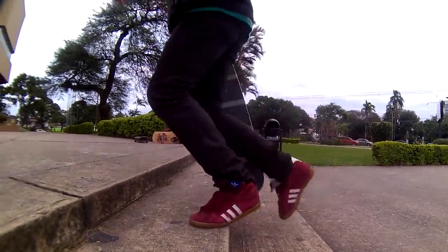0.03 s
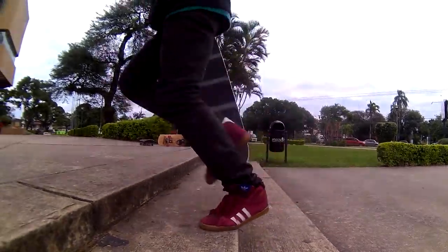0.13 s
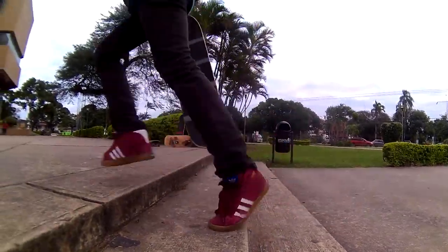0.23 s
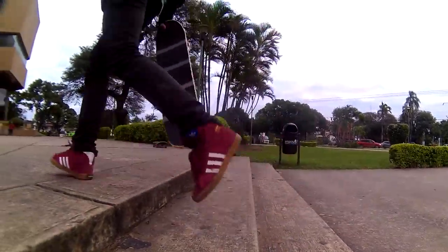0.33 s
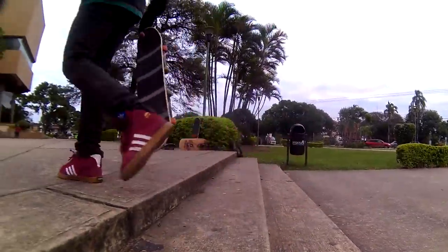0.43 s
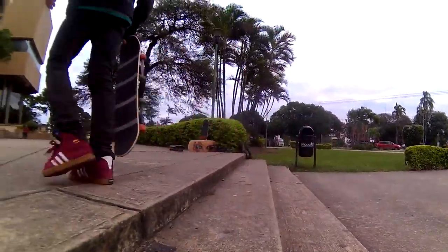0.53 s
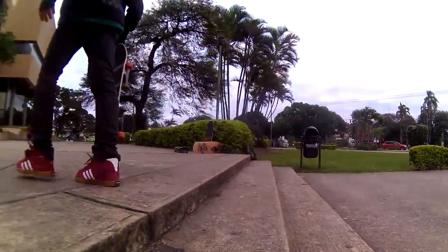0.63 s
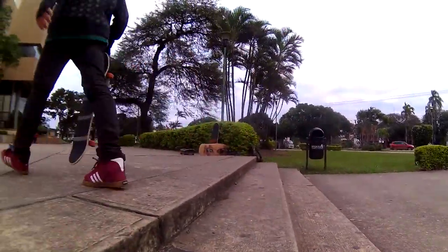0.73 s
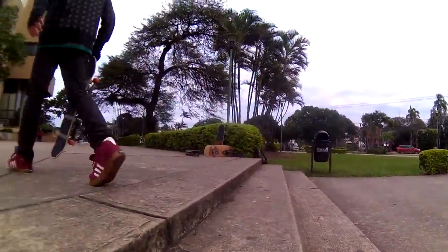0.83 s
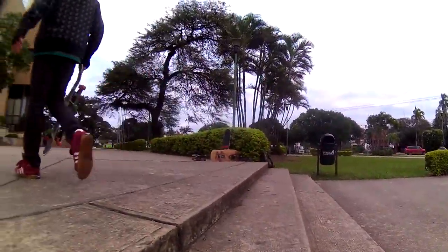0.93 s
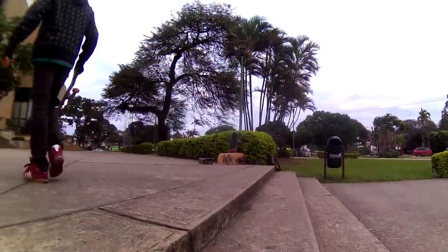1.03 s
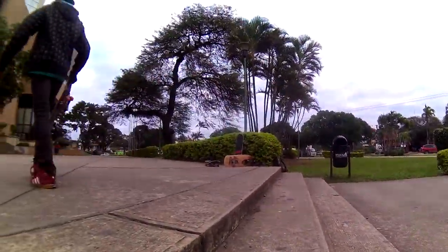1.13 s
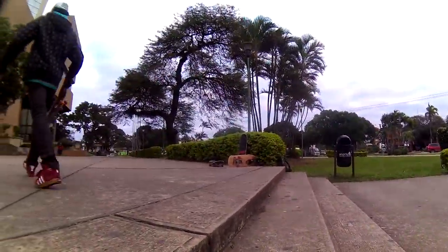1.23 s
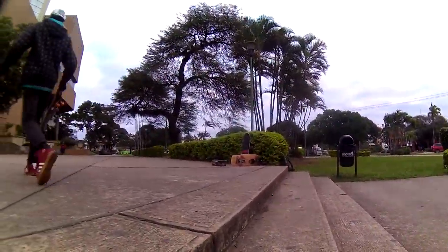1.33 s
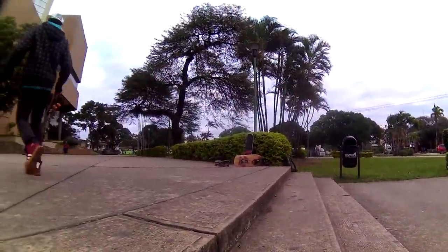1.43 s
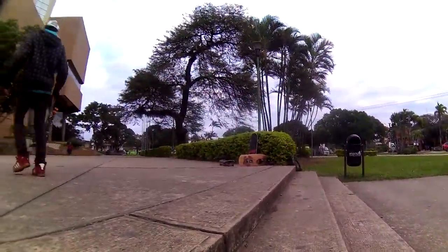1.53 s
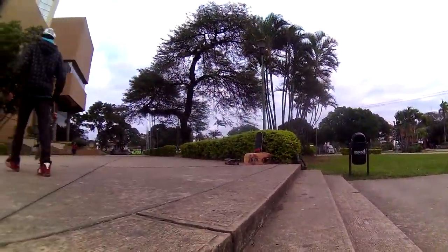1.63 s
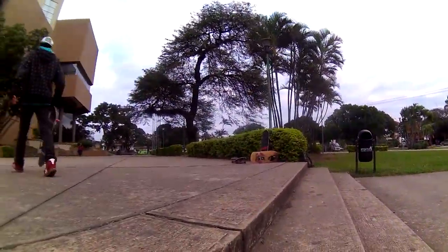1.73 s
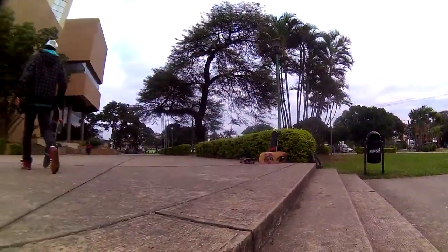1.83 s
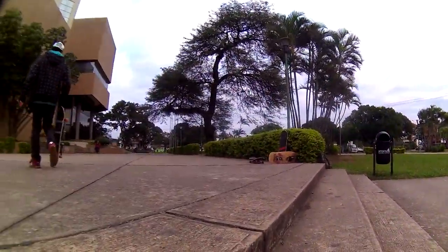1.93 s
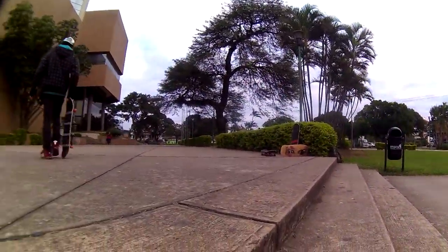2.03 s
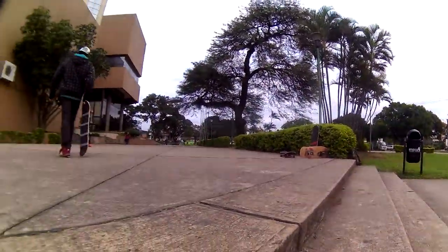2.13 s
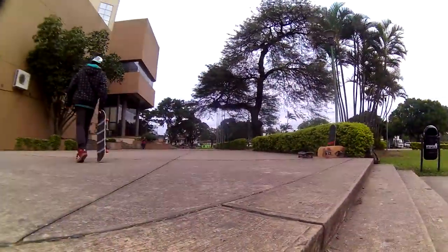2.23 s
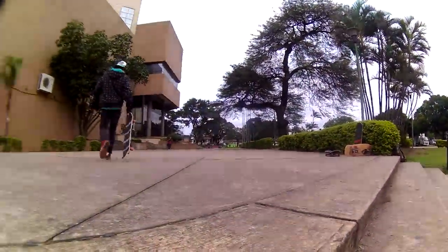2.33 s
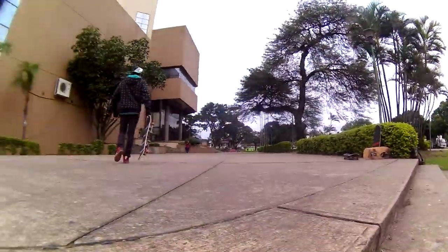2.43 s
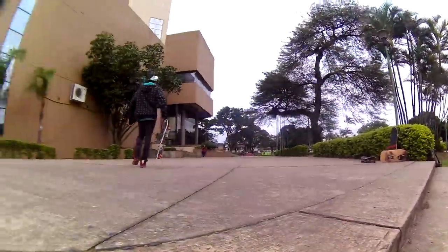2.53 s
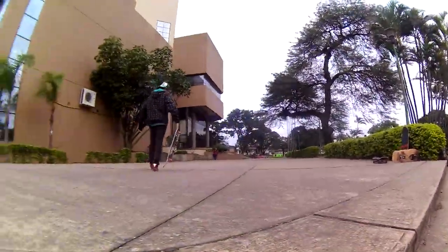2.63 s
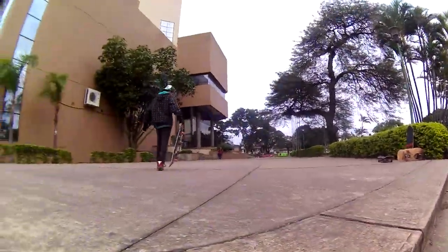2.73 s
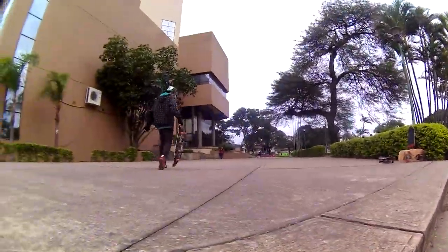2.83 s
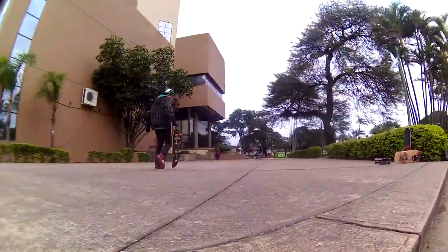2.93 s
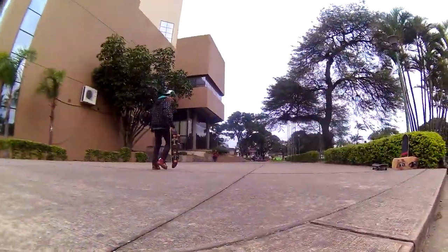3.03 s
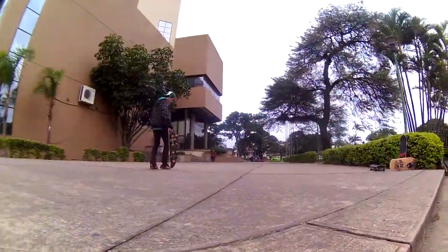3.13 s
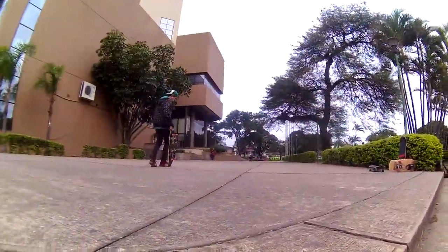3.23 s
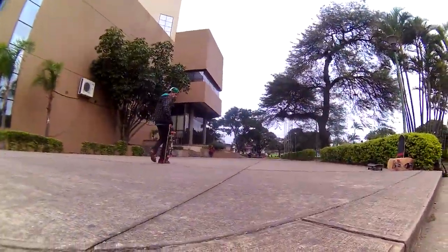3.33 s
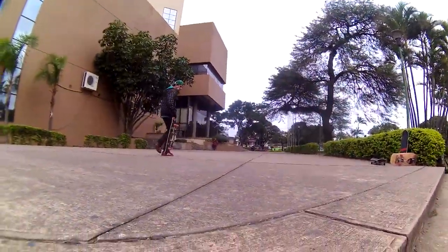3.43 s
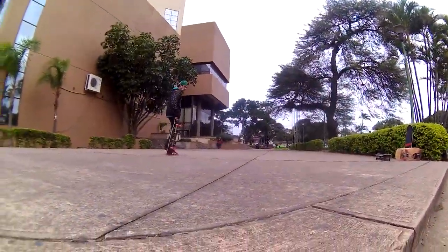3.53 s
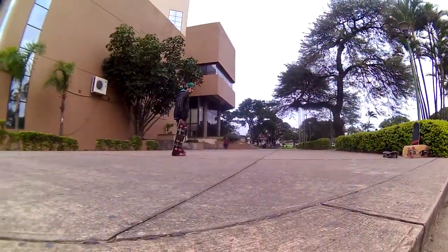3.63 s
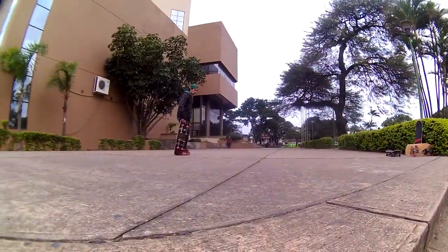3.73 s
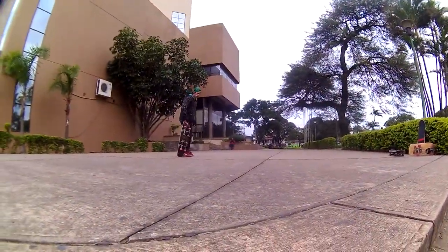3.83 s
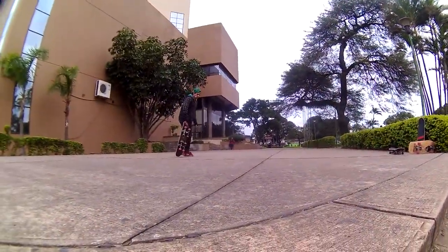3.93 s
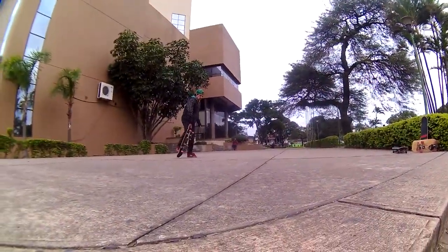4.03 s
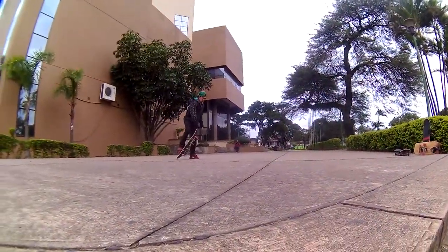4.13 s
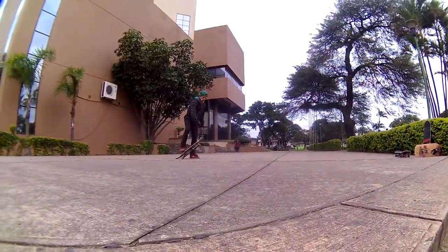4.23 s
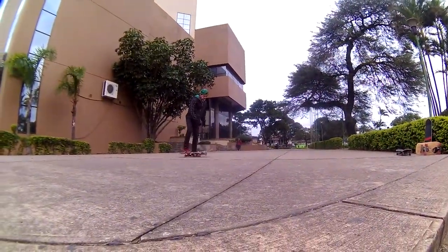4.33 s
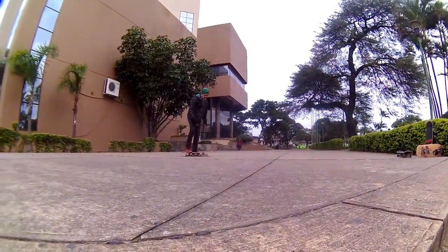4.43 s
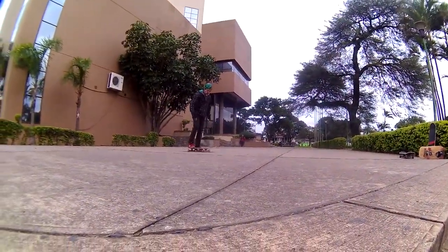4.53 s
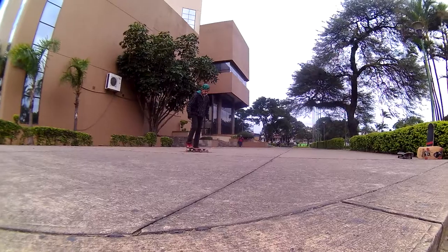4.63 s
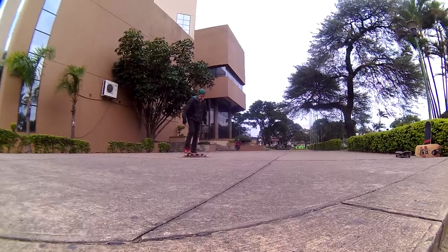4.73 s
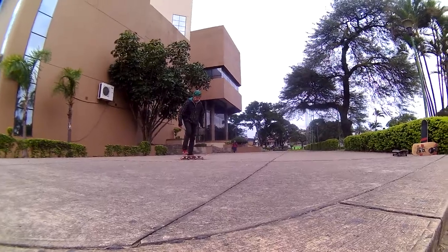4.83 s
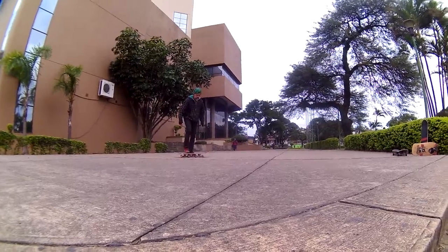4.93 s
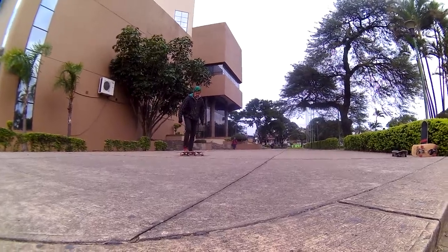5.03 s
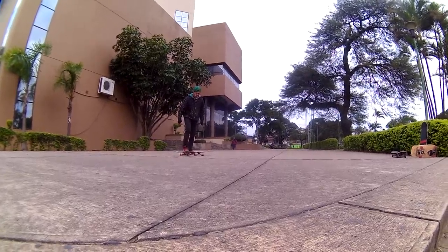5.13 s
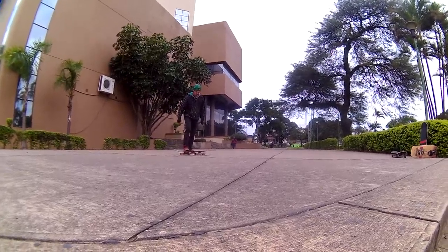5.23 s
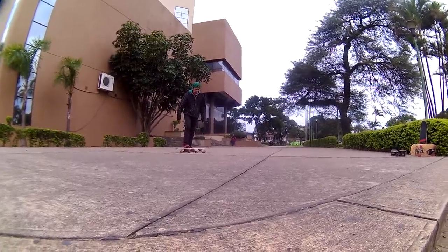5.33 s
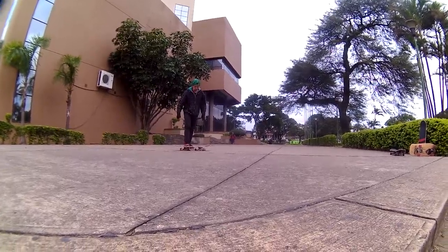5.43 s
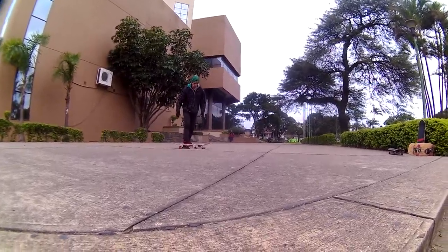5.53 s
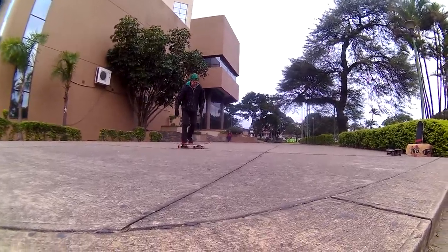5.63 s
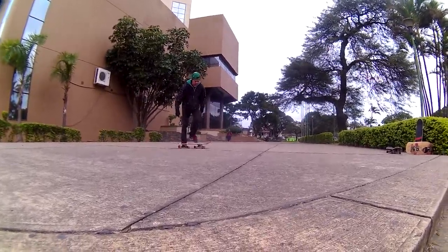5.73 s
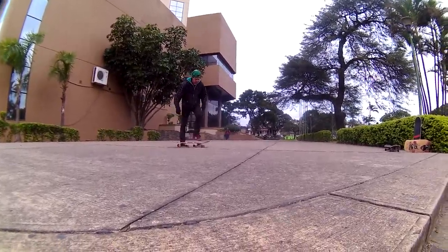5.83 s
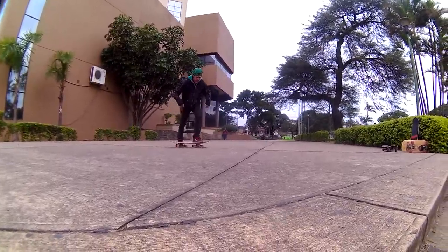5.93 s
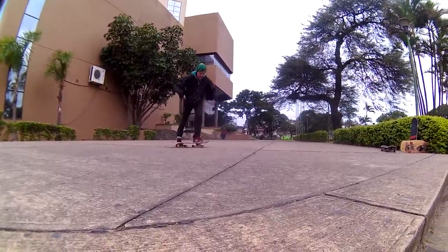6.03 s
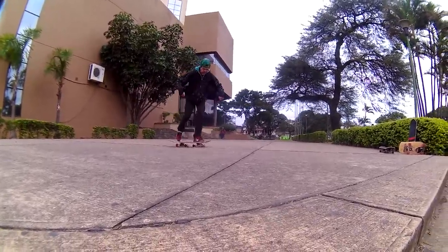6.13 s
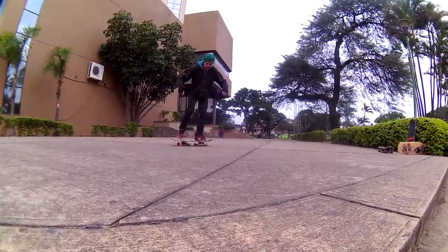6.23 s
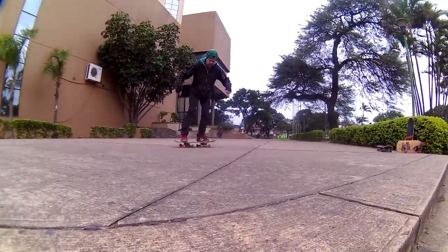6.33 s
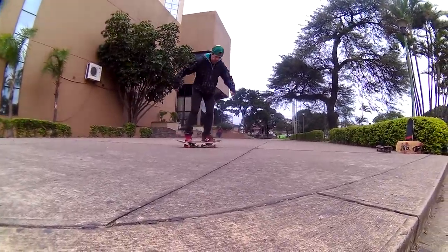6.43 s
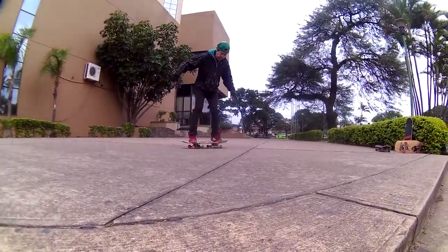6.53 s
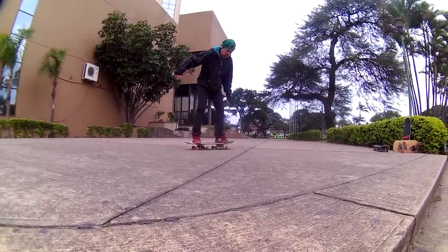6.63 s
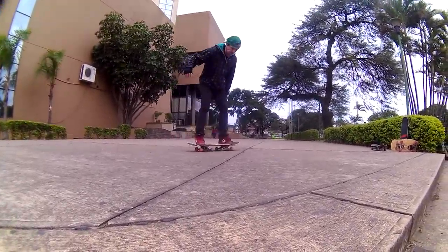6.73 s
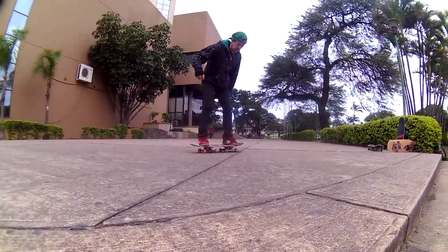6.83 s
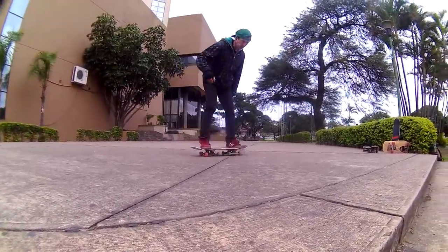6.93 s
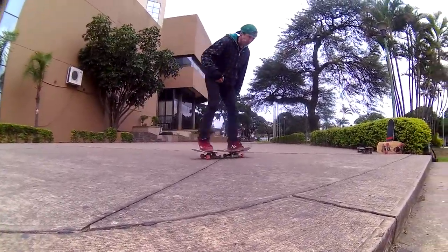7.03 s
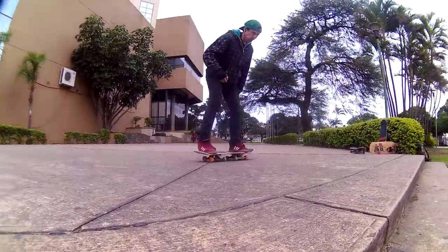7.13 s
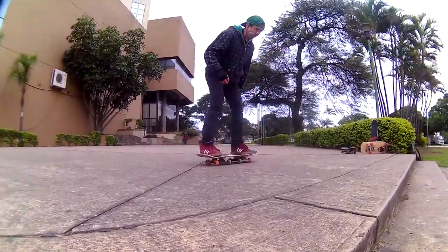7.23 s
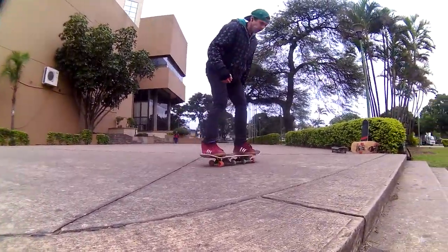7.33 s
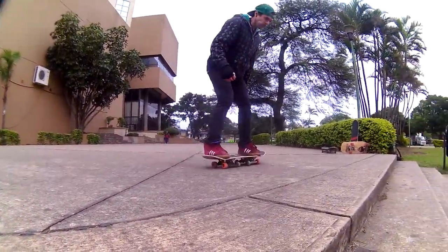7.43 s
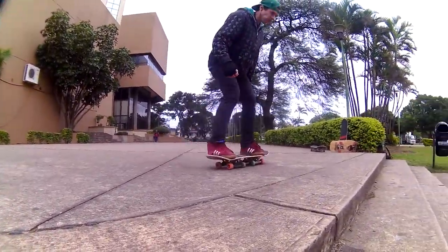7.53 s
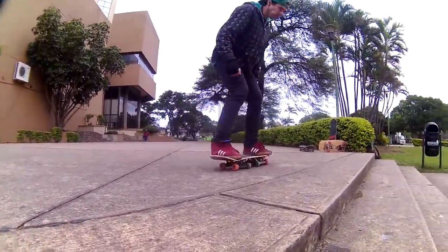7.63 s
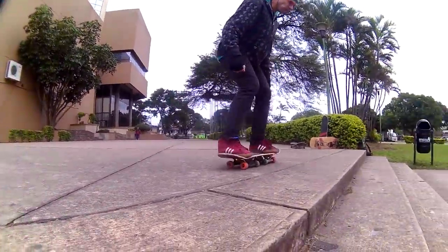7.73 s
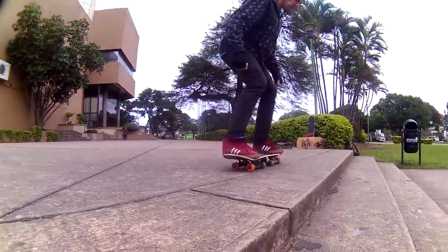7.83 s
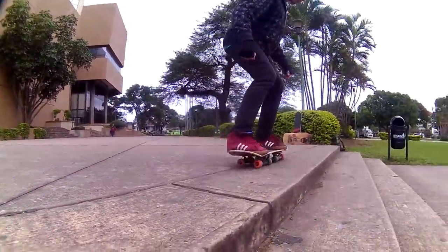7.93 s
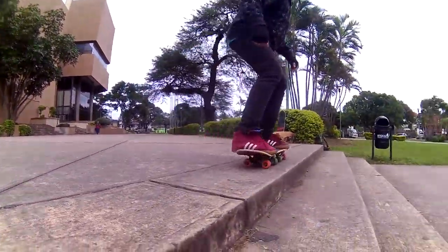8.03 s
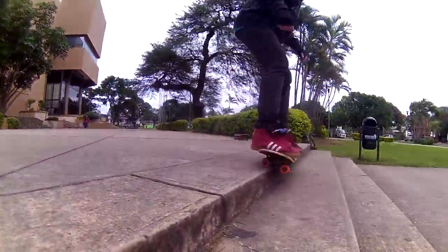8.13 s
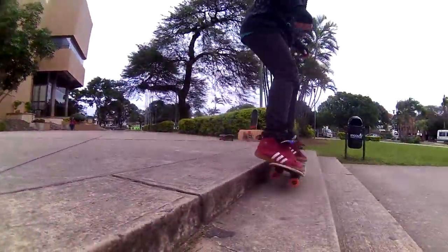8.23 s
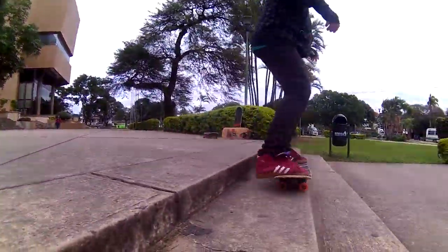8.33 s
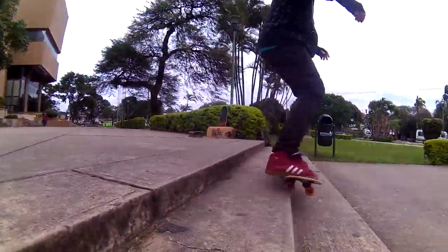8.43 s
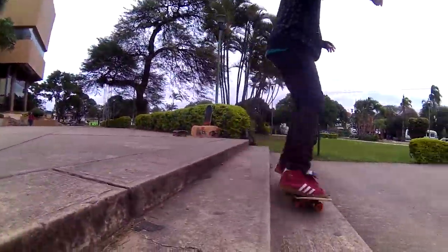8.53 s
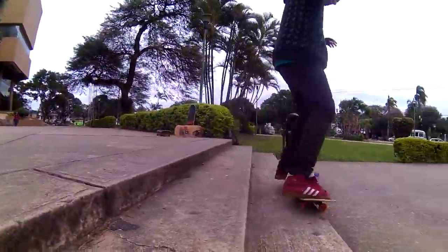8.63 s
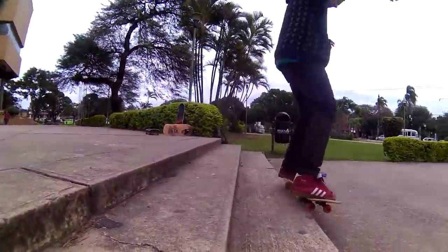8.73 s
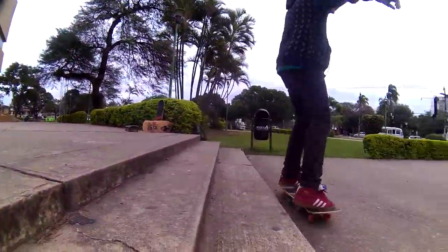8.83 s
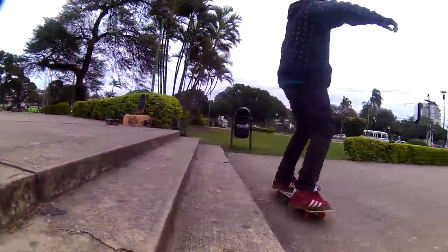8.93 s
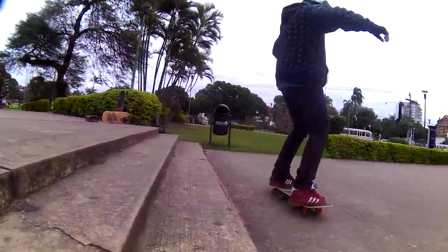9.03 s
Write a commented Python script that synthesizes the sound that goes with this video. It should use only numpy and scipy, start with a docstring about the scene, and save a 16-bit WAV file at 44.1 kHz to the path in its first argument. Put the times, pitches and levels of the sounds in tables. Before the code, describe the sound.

Over a hollow outdoor hum, a skateboard is set down, dropped, ridden across gritty paving with growing roar, and banged down concrete steps.

```python
"""Over a hollow park hum and the rumble of a hand-held plastic camera case, a skater carries his board up
concrete steps: soles scuff sand, a footstep knocks, the board is set down. Thin chirps and a soft rasp pass.
He drops the board on a paved plaza, steps on it and rolls back: hard wheels crush sand, snap grit and click
hollowly, then the board clatters down the steps. Noise is shaped by resonances, blows are decaying modes
and noise bursts; the case colours the sounds and near clacks overload the microphone."""
import sys
import numpy as np
from scipy import signal
from scipy.fft import rfft, irfft, next_fast_len
from scipy.io import wavfile

SR = 44100
rng = np.random.default_rng(int(sys.argv[2]) if len(sys.argv) > 2 else 0)


def generate_wav(sig):
    """Save sig (samples, or channels by samples) to the path in sys.argv[1] as 16-bit PCM at SR."""
    pcm = np.round(np.clip(np.atleast_2d(sig).T, -1, 1) * 32767).astype(np.int16)
    wavfile.write(sys.argv[1], SR, pcm)


N = 401310


def from_db(db):
    """Level law: 20 dB is a factor of ten in amplitude."""
    return 10 ** (np.asarray(db) / 20)


def rms_one(x):
    """Normalisation to unit effective value."""
    return x / np.sqrt(np.mean(x ** 2) + 1e-20)


def in_time(rows):
    """Linear interpolation: each column of a curve, sample by sample."""
    s, *columns = np.transpose(rows)
    return [np.interp(np.arange(N) / SR, s, column) for column in columns]


def add(track, s, sound):
    """Superposition: lay a sound into a track at s seconds."""
    at = max(round(s * SR), 0)
    track[at:at + len(sound)] += sound[:N - at]


def cut(x, hz, kind, order=2):
    """Butterworth filtering: a maximally flat passband."""
    sos = signal.butter(order, np.clip(hz, 10, .45 * SR), kind, fs=SR, output="sos")
    return signal.sosfilt(sos, x + 1e-18)


def drift(rate):
    """Low-passed noise: a slow random curve of rms 1, smoothed by two equal poles at rate [Hz]."""
    step = 40   # samples between the points of the slow curve
    r = np.exp(-2 * np.pi * step * rate / SR)
    slow = signal.lfilter([1], [1, -2 * r, r * r], rng.standard_normal(N // step + 2002))
    slow = slow[2000:]   # drop the filter's start
    return np.interp(np.arange(N) / step, np.arange(len(slow)), rms_one(slow))


def coloured_noise(spectrum):
    """Spectral shaping: white noise weighted in frequency, rms 1."""
    hz, level_db = np.transpose(spectrum)
    size = next_fast_len(N)
    bins = np.maximum(np.fft.rfftfreq(size, 1 / SR), 1)
    gain = from_db(np.interp(np.log(bins), np.log(hz), level_db))
    return rms_one(irfft(rfft(rng.standard_normal(size)) * gain, size)[:N])


def resonate(x, hz, width_hz):
    """Damped resonance: two equal stages give steep sides, gain about 1 on top."""
    r = np.exp(-np.pi * width_hz / SR)
    stage = [(1 - r * r) / 2, 0, -(1 - r * r) / 2, 1, -2 * r * np.cos(2 * np.pi * hz / SR), r * r]
    return signal.sosfilt([stage, stage], x + 1e-18)


def ring(t, hz, t60):
    """Free vibration of a struck mode: a sine losing 60 dB in t60 seconds."""
    return np.sin(2 * np.pi * hz * t) * from_db(-60 * t / t60)


def bump(t, hz, rise_s):
    """Heavily damped oscillation: a soft knock of a cycle or two, height about 1."""
    return t / rise_s * np.exp(1 - t / rise_s) * np.sin(2 * np.pi * hz * t)


def grains(per_s, spread_db):
    """Shot noise: random clicks of uneven size, rms 1."""
    size_db = spread_db * np.minimum(rng.exponential(1, N), 5)
    sizes = from_db(size_db) * rng.choice([-1, 1], N)
    return rms_one(sizes * (rng.random(N) < per_s / SR))


# resonances of the camera case: (frequency [Hz], width [Hz], level [dB])
CASE_RESONANCES = [(418, 355, -14.5), (608, 288, -7), (860, 57, -52), (1260, 89, -62), (1984, 536, -15.5),
                   (2630, 195, -17.5), (3870, 730, -23), (5550, 1600, -29), (6850, 770, -42),
                   (8200, 310, -36), (11130, 2200, -30.5), (16500, 3100, -35.5)]
# narrow cancellations between the sound paths through the case: (frequency [Hz], width [Hz])
CASE_CANCELLATIONS = [(1560, 88), (3250, 850), (4490, 450), (7800, 220), (9000, 350), (14700, 450)]


def case(x):
    """Resonance and interference: the case boosts some bands and cancels others."""
    out = sum(from_db(db) * resonate(x, hz, width) for hz, width, db in CASE_RESONANCES)
    for hz, width in CASE_CANCELLATIONS:
        out = signal.lfilter(*signal.iirnotch(hz, hz / width, fs=SR), out)
    return out


# spectrum of the park heard through the case: (frequency [Hz], relative level per Hz [dB])
PARK_SPECTRUM = [(200, -5), (330, -0.5), (560, 2), (700, 4.5), (840, -8.5), (1050, -17.5), (1280, -24),
                 (1480, -18), (1620, -22.5), (2100, -20), (2750, -27), (3230, -38), (3900, -30),
                 (4550, -38), (5800, -36.5), (7000, -39.5), (17000, -40.5)]


def park(air_db=-35, whine_db=-76, whine_hz=10040):
    """Stationary noise: a steady hollow background with a faint electrical whine."""
    air = from_db(air_db) * coloured_noise(PARK_SPECTRUM)
    whine = rms_one(resonate(rng.standard_normal(N), whine_hz, 200))
    return air + from_db(whine_db) * whine


# level of the hand's rumble before its lumps: (time [s], level [dB])
GRIP_LEVEL = [(0.0, -24), (0.3, -29.5), (0.58, -26), (0.8, -29), (1.55, -27.5), (1.9, -25.5), (2.04, -24.5),
              (2.38, -22), (2.48, -25), (4.26, -27), (4.33, -20), (4.54, -28), (6.69, -24.5), (7.2, -26.5),
              (7.5, -23), (8.01, -24), (8.29, -39), (8.36, -24.5), (8.59, -29), (8.69, -21), (8.74, -28.5),
              (9.05, -24.5), (9.1, -30)]
# spectrum of the rumble: (frequency [Hz], relative level per Hz [dB])
RUMBLE_SPECTRUM = [(12, -34), (20, -2), (76, 2), (161, -0.5), (208, -3.5), (325, -9), (357, -12),
                   (398, -9.5), (455, -16.5), (500, -11.5), (650, -16.5), (1100, -120)]
# knocks on the case: (time [s], peak level, approximate [dB], frequency [Hz])
CASE_BUMPS = [(0.544, -13.5, 62), (0.646, -14.5, 70), (1.059, -12.5, 78), (1.287, -9.5, 108),
              (1.452, -11, 90), (1.632, -14, 87), (2.039, -10.5, 119), (2.148, -10.5, 130),
              (2.323, -11, 95), (2.382, -9.5, 119), (2.862, -13, 77), (3.786, -18.5, 110),
              (4.31, -6.5, 112), (4.346, -8.5, 104), (4.379, -14, 99), (4.675, -16, 96)]


def handling(rumble_db=0.0, lumpy_db=0.83, bump_s=0.0034):
    """Friction noise and impact: the hand rubs the case into a lumpy rumble and at times bumps it."""
    grip_db, = in_time(GRIP_LEVEL)
    rub_db = grip_db + rumble_db + lumpy_db * drift(6.5)
    out = from_db(rub_db) * coloured_noise(RUMBLE_SPECTRUM)
    t = np.arange(SR // 8) / SR
    for s, db, hz in CASE_BUMPS:
        add(out, s, from_db(db) * bump(t, hz, bump_s))
    return out


# far low tones, before their waver: (time of the peak [s], spread [s], level [dB],
# frequency at the peak [Hz], glide [Hz/s])
DRONE_TONES = [(0.97, 0.36, -40, 327, 0), (2.85, 0.55, -29, 156.2, 0), (2.95, 0.15, -38, 322, -20),
               (3.3, 0.2, -28, 190, 28)]


def drone(waver_hz=0.75, waver_db=3.0):
    """Frequency and amplitude modulation: wavering low tones swell, glide and fade, like far engines."""
    t = np.arange(N) / SR
    out = np.zeros(N)
    for s, spread, db, hz, glide in DRONE_TONES:
        level = from_db(db + waver_db * drift(1.0))
        swell = np.exp(-.5 * ((t - s) / spread) ** 2)
        pitch = hz + glide * (t - s) + waver_hz * drift(3.2)
        out += level * swell * np.sin(2 * np.pi * np.cumsum(pitch) / SR)
    return out


# shoes scuffing the ground, and last the wheels rasping over grit as the rolling begins:
# (time [s], length [s], sand level [dB], rub level [dB], centre of the sand's hiss [Hz])
GRIT_SCUFFS = [(0.161, 0.019, -9.5, -18.5, 6700), (0.477, 0.051, -7.5, -23, 12000),
               (0.543, 0.022, -9, -20, 11000), (0.965, 0.032, -17, -27, 11000),
               (0.999, 0.043, -18, -28, 7800), (1.692, 0.015, -10, -24, 8000),
               (1.73, 0.025, -19, -22, 8000), (3.029, 0.023, -18.5, -36, 6000),
               (4.35, 0.0069, -5, -28, 12000), (4.375, 0.013, -16.5, -16, 10000),
               (4.849, 0.011, -16, -33, 7600), (5.258, .008, -18, -45, 7900), (5.972, 0.27, -19, -29, 6600)]
SAND_SPAN, RUB_HZ = 1.41, (326, 2470)   # hiss reaches this ratio either side; band of the dull rub


def scuffs(release_s=0.0062, crumble_db=5.0):
    """Granular friction: soles or wheels drag over sand, a crackle, brighter if finer, over a dull rub."""
    t = np.arange(SR // 3) / SR
    hiss, rub = np.zeros((2, N))
    sand = grains(per_s=1300, spread_db=2.0) * from_db(crumble_db * np.tanh(drift(96)))
    for s, length, sand_db, rub_db, hz in GRIT_SCUFFS:
        attack = np.minimum(t / (0.064 * length), 1)
        stroke = attack * np.exp(-np.maximum(t - length, 0) / release_s)
        patch = sand[round(s * SR):][:len(t)]
        crackle = rms_one(cut(patch, [hz / SAND_SPAN, hz * SAND_SPAN], "band", order=1))
        add(hiss, s, from_db(sand_db) * stroke * crackle)
        add(rub, s, from_db(rub_db) * stroke)
    return case(hiss + rub * rms_one(cut(sand, RUB_HZ, "band", order=1)))


# how far the skater is from the camera: (time [s], distance [m])
SKATER_DISTANCE = [(0, 1.2), (1.7, 16), (4.2, 5.5), (5.7, 4.9), (7.0, 2.16), (8.0, 1.36), (8.6, 2.38),
                   (9.1, 1.57)]


def doublings():
    """Distance law: how often the distance has doubled from 1 m, sample by sample."""
    metres, = in_time(SKATER_DISTANCE)
    return np.log2(np.maximum(metres, 1))


def through_wall(x, low_hz=760, high_hz=1130, fade_db=11.5):
    """Band transmission: close by, the case wall passes a band just above its hollow resonance."""
    return cut(x, [low_hz, high_hz], "band") * from_db(-fade_db * doublings())


# a footstep, then blows on the board (set down, dropped, then down the steps):
# (time [s], ring level [dB], ring frequency [Hz], ring length [s], wood level [dB], crack level [dB],
# crack decay time constant [s], top of the crack when far [Hz])
STEP_AND_BOARD_BLOWS = [(0.484, -9.5, 636, 0.006, -16, -4, .004, 8000),
                        (1.6895, 14, 408, 0.005, 1, 3, 0.0068, 2500),
                        (1.694, -7.5, 707, 0.017, 1, 6.5, 0.0045, 2500),
                        (1.714, -14, 710, 0.018, -8, -4, 0.0057, 2000),
                        (1.7315, -7, 715, .011, 0, -2, 0.0066, 3000),
                        (1.739, -9, 710, 0.0085, -6, -8, .005, 3000),
                        (4.138, -0.5, 687, 0.0085, -8, 13, 0.0032, 4970),
                        (4.150, -15, 690, .015, -15, -9, 0.023, 5550),
                        (4.162, -24, 734, .015, -14, -4, 0.035, 6000),
                        (4.2535, -19, 620, .008, -14, 15, 0.0076, 8000),
                        (4.2575, 13.5, 601, .012, 2, 19, 0.0029, 6000),
                        (4.293, -6, 614, 0.0099, -1, 1.5, 0.014, 4000),
                        (4.314, 0, 510, 0.0066, -14, -7, .008, 8000),
                        (4.353, -7, 600, 0.013, -11, 3, .004, 6000),
                        (8.1295, 13, 637, 0.012, 21, 23, .0052, 8000),
                        (8.1475, 1.5, 672, 0.022, 15, 14.5, 0.0063, 4500),
                        (8.216, -14, 700, 0.0071, 0, 3, 0.0033, 5500),
                        (8.322, -26, 710, .012, -22, -4, 0.015, 5500),
                        (8.378, 12, 730, .0035, 3, 18, 0.0089, 5270),
                        (8.385, -2, 600, .005, 1, 8, 0.015, 4000),
                        (8.397, -22, 640, 0.0072, -4, 13, 0.005, 4000),
                        (8.4075, -10, 700, .004, 18.5, 20, 0.004, 5000),
                        (8.4102, 17.5, 695, 0.01, 25, 20, 0.0067, 6000),
                        (8.636, 3, 694, 0.015, -5, 18, .0057, 3220),
                        (8.656, 1, 715, .012, 1, 12, 0.0076, 3000),
                        (8.666, -4, 634, 0.009, -11, 24.5, 0.004, 5000),
                        (8.6755, 4, 660, 0.016, 10, 11, 0.0063, 5000),
                        (8.6935, 1, 654, 0.014, -18, 20.5, 0.002, 5500)]
# hollow clicks of the board being stepped on, then of its wheels:
# (time [s], ring level [dB], ring frequency [Hz], wood level [dB], crack level [dB])
HOLLOW_CLICKS = [(5.778, -17, 642, -13, 5), (5.831, -11, 640, -9, 2.5), (6.081, -9, 670, -20, -4),
                 (6.187, -10.5, 657, -11, -2), (6.228, -17, 660, -8, 2), (6.291, -21.5, 670, -11, -3),
                 (7.296, -10.5, 713, -17, 4), (7.392, -15, 730, 0, -1), (7.739, -5, 714, -6, 17.5),
                 (7.819, -5.5, 730, 8, 14), (7.963, -11, 700, -17, 15.5), (8.03, -16, 730, 2, 10)]
# shared by all hollow clicks: length of the ring, decay and far top of the crack
CLICK_RING_S, CLICK_CRACK_S, CLICK_TOP_HZ = 0.018, 0.0023, 6500


def blows():
    """Impact excitation: every blow and hollow click, as rows like STEP_AND_BOARD_BLOWS."""
    rows = list(STEP_AND_BOARD_BLOWS)
    for s, ring_db, hz, wood_db, crack_db in HOLLOW_CLICKS:
        rows.append((s, ring_db, hz, CLICK_RING_S, wood_db, crack_db, CLICK_CRACK_S, CLICK_TOP_HZ))
    return rows


# upper modes of the deck and trucks, before random spread:
# (frequency [Hz], level [dB], 60 dB decay time [s])
DECK_MODES = [(916, -10, 0.015), (1070, -4, 0.0051), (1330, -9, .014), (1670, -13, 0.028),
              (1956, -15, 0.029), (2160, -14, 0.023), (2810, -18, 0.022)]


def wood_knock(t, spread_db, detune):
    """Modal superposition: deck modes of random sign, slightly uneven in level and pitch."""
    knock = np.zeros(len(t))
    for hz, db, t60 in DECK_MODES:
        level = from_db(db + spread_db * rng.standard_normal()) * rng.choice([-1, 1])
        knock += level * ring(t, hz * rng.normal(1, detune), t60)
    return knock


RING_LAG_S = 0.001413   # the hollow ring follows the crack
RING_TAPER = 1.08   # exponent: the ring dies almost in a straight line
RATTLE_DB, RATTLE_S = -19, 0.012   # a rattle after each crack: level against it, decay


def clacks(crack_low_hz=1400, thud_db=5.0, thud_hz=420, thud_width_hz=300, near_m=0.93,
           contact_s=0.0012, shock_db=-25, shock_hz=240, shock_s=0.0015, wall_db=-8,
           mode_spread_db=2.0, mode_detune=0.029):
    """Impact response: a gritty crack, dull thud, woody knock and hollow ring; near blows jolt the case."""
    t = np.arange(SR // 6) / SR
    rings, cracks, dull, shocks = np.zeros((4, N))
    for s, ring_db, hz, ring_s, wood_db, crack_db, crack_s, top_hz in blows():
        wood = wood_knock(t, mode_spread_db, mode_detune)
        hollow = np.sin(2 * np.pi * hz * t) * np.maximum(1 - t / ring_s, 0) ** RING_TAPER
        decay = np.exp(-t / crack_s) + from_db(RATTLE_DB) * np.exp(-t / RATTLE_S)
        burst = decay * (1 - np.exp(-t / contact_s))
        crack = from_db(crack_db) * rng.standard_normal(len(t)) * burst
        add(rings, s + RING_LAG_S, from_db(ring_db) * hollow + from_db(wood_db) * wood)
        add(cracks, s, crack)
        add(dull, s, cut(crack, top_hz, "low", order=1))
        add(shocks, s, from_db(crack_db + shock_db) * bump(t, shock_hz, shock_s))
    thuds = from_db(thud_db) * resonate(cracks, thud_hz, thud_width_hz)
    nearness = np.minimum(near_m / 2 ** doublings(), 1)
    # the nearer the blow, the more of its top remains
    sharp = cut(dull + nearness * (cracks - dull), crack_low_hz, "high")
    inside = case(rings + thuds + sharp)
    return inside + nearness * shocks + from_db(wall_db) * through_wall(cracks)


def plaza(x, t60=0.56, wet_db=-24, bass_cut_hz=1200):
    """Reverberation: steps and building scatter a thin tail, relatively stronger from farther away."""
    t = np.arange(int(.7 * SR)) / SR
    tail = rng.standard_normal(len(t)) * from_db(-60 * t / t60)
    tail *= t > .012   # silent until the first reflections
    metres, = in_time(SKATER_DISTANCE)
    send = cut(x, bass_cut_hz, "high", order=1) * np.sqrt(np.maximum(metres, 1))
    return x + from_db(wet_db) * signal.fftconvolve(send, tail / np.linalg.norm(tail))[:N]


# thin high chirps: (time [s], length [s], level [dB], frequency [Hz])
HIGH_CHIRPS = [(2.145, 0.03, -58, 7950), (2.274, 0.014, -60, 5750), (2.56, 0.016, -55, 3680),
               (5.204, 0.052, -56, 7900), (5.71, .036, -55, 7900)]


def chirps():
    """Pure tones under a smooth window: thin peeps."""
    out = np.zeros(N)
    for s, length, db, hz in HIGH_CHIRPS:
        t = np.arange(int(length * SR)) / SR
        window = signal.windows.tukey(len(t), .5)
        add(out, s, from_db(db) * window * np.sin(2 * np.pi * hz * t))
    return out


# bands of a soft high rasp, before its swell: (frequency [Hz], width [Hz], level [dB])
RASP_HISS = [(4360, 1600, -59), (10900, 1500, -63)]


def rasp(start_s=2.584, length_s=0.22):
    """Amplitude modulation: narrow hiss swells and fades once over half a sine."""
    progress = np.clip((np.arange(N) / SR - start_s) / length_s, 0, 1)
    hiss = np.zeros(N)
    for hz, width, db in RASP_HISS:
        hiss += from_db(db) * rms_one(resonate(rng.standard_normal(N), hz, width))
    return np.sin(np.pi * progress) * hiss


# stretches of rolling, added to the idle: (start time [s], end time [s], strength [dB])
ROLLING_STRETCHES = [(5.425, 5.768, -35), (5.766, 6.034, -12), (6.048, 6.537, 0), (6.554, 6.908, -5),
                     (6.913, 7.072, -2), (7.071, 7.274, -2.5), (7.276, 7.886, -1), (7.886, 7.956, -2.5),
                     (7.955, 8.065, -2), (8.417, 8.43, -12), (8.499, 8.593, 0), (8.756, 9.2, -13.5)]
ROLL_RAMP_S = 0.011
# between the stretches the wheels turn lightly, from the moment the board is nudged forward
NUDGE_S, IDLE_DB = 4.8, -11.5


def wheel_effort():
    """Envelope of excitation: a light idle, and a ramp up and down for each stretch."""
    t = np.arange(N) / SR
    effort = from_db(IDLE_DB) * (t > NUDGE_S)
    for start, end, db in ROLLING_STRETCHES:
        ramps = np.minimum(t - start, end - t) / ROLL_RAMP_S + .5
        effort = effort + from_db(db) * np.clip(ramps, 0, 1)
    return effort


def wander(x, spread_hz, rate):
    """Single-sideband modulation: shift a narrow sound slowly and randomly up and down in pitch."""
    phase = 2 * np.pi * np.cumsum(spread_hz * drift(rate)) / SR
    return np.real(signal.hilbert(x, next_fast_len(N))[:N] * np.exp(1j * phase))


# the wheels' midrange growl and wall crunch, before surges: (time [s], level offset [dB])
GROWL_LEVEL = [(6.0, -6), (6.2, 3), (6.5, 0), (6.62, -5.5), (6.85, -9), (6.93, 0.5), (7.1, -7.5),
               (7.55, -1.5), (7.92, -8), (8.03, 1.5), (8.5, -1.5)]
# what each part of the wheel noise loses per doubling of distance
HUM_FADE_DB, DECK_FADE_DB, ROAR_FADE_DB = 8, -3, 8.5   # the deck tone gains
GROWL_FADE_DB, GRIT_FADE_DB, SIZZLE_FADE_DB = 9.5, 4, 11


def rolling(hum_db=-28.5, deck_db=-39, roar_db=-26, growl_db=-33.0, grit_db=-47, sizzle_db=-44,
            crunch_db=-23.5, patchy_db=1.0, deck_hz=680, deck_width_hz=110, deck_wander_hz=22,
            rattle_db=1.95, swell_db=-0.5, coarse_db=0.0):
    """Roughness excitation: hard wheels crush grains; the deck's hum wanders slowly, randomly in pitch.

    Close by a broad roar takes over. Levels are at 1 m, before the wheels' effort.
    """
    far = doublings()
    sand = grains(per_s=9600, spread_db=3.5)
    coarse = grains(per_s=300, spread_db=3.5)
    surface = (sand + from_db(coarse_db) * coarse) * from_db(patchy_db * np.tanh(drift(40)))
    contact = case(surface)
    low = cut(contact, 933, "low", order=4)
    deck = wander(resonate(low, deck_hz, deck_width_hz), deck_wander_hz, rate=5)
    roar = cut(surface, (393, 842), "band", order=4)
    growl = cut(contact, [1200, 3200], "band", order=4)
    grit = cut(contact, [3400, 9000], "band", order=4)
    sizzle = cut(contact, [10200, 15000], "band")
    growl_level, = in_time(GROWL_LEVEL)
    # the trucks shake in uneven surges
    rattle = growl_level + rattle_db * drift(4.5) + swell_db * np.tanh(drift(16))
    out = from_db(hum_db - HUM_FADE_DB * far) * rms_one(low)
    out += from_db(deck_db - DECK_FADE_DB * far) * rms_one(deck)
    out += from_db(roar_db - ROAR_FADE_DB * far) * rms_one(roar)
    out += from_db(growl_db - GROWL_FADE_DB * far + rattle) * rms_one(growl)
    out += from_db(grit_db - GRIT_FADE_DB * far) * rms_one(grit)
    out += from_db(sizzle_db - SIZZLE_FADE_DB * far) * rms_one(sizzle)
    out += from_db(crunch_db + rattle) * through_wall(surface)
    return out * wheel_effort()


# larger pebbles snapping under a wheel: (time [s], level before the case [dB])
PEBBLE_SNAPS = [(5.52, -9), (5.718, -7), (5.817, -1.5), (5.92, -7), (5.99, -3), (6.246, -7), (6.422, -5),
                (6.677, -12), (6.752, -13), (6.77, -2), (6.792, -5), (6.92, -13), (6.995, 2), (7.04, 4),
                (7.139, 3), (7.323, -8), (7.395, 0), (7.448, 1), (7.467, 0), (7.511, -5), (7.581, 6),
                (7.597, 6.5), (7.72, -6), (7.787, 3), (7.844, 3), (7.976, 3)]
# loose grit: rate, level at 1 m before effort, unit of the random spread
STONES_PER_S, STONE_DB, STONE_SPREAD_DB = 80, -5.5, 9
STONE_FADE_DB, STONE_FOLLOWS = 7.5, 0.36   # loss per doubling of distance; exponent on the wheels' effort


def stones(snap_s=0.0033, low_hz=1500, pebble_s=0.0029):
    """Random impacts: grit snaps in bright ticks, louder when near and rolling hard; some pebbles stand out."""
    t = np.arange(SR // 50) / SR
    size_db = STONE_DB - STONE_FADE_DB * doublings() + STONE_SPREAD_DB * rng.uniform(-2.2, 1, N)
    sizes = from_db(size_db) * wheel_effort() ** STONE_FOLLOWS
    hits = sizes * (rng.random(N) < STONES_PER_S / SR)
    snaps = signal.fftconvolve(hits, np.exp(-t / snap_s))[:N]
    for s, db in PEBBLE_SNAPS:
        add(snaps, s, from_db(db) * np.exp(-t / pebble_s))
    return case(cut(snaps * rng.standard_normal(N), low_hz, "high"))


# the background level dips briefly just after 8.2 s: (time [s], level change [dB])
BACKGROUND_DIP = [(0, -1.5), (8.15, 0), (8.18, -11), (8.30, -3.5), (8.35, 2), (9.1, -1.5)]


def scene():
    """Superposition: the skater over the rumble of the hand and the sounds of the park."""
    dip_db, = in_time(BACKGROUND_DIP)
    background = handling() + from_db(dip_db) * (park() + drone()) + chirps() + rasp()
    skater = plaza(scuffs() + clacks()) + rolling() + stones()
    return (skater + background)[None]


def record(dry, hardness=11, cutoff_hz=17230):
    """Saturation and band limiting: the microphone flattens the biggest peaks; the top is cut."""
    clipped = dry / (1 + np.abs(dry) ** hardness) ** (1 / hardness)
    return signal.sosfilt(signal.ellip(10, .1, 70, cutoff_hz, fs=SR, output="sos"), clipped)


dry = scene()
out = record(dry)
generate_wav(out)
```